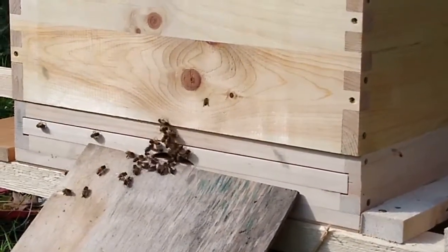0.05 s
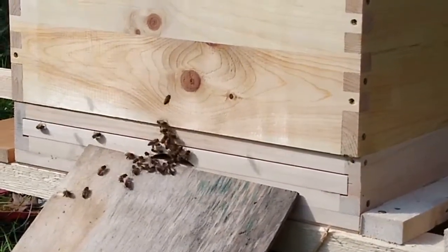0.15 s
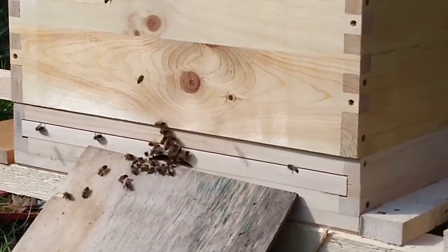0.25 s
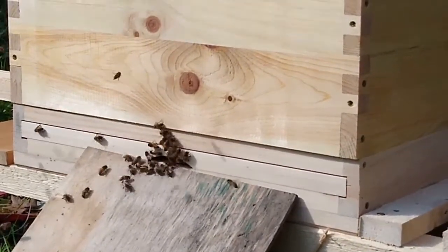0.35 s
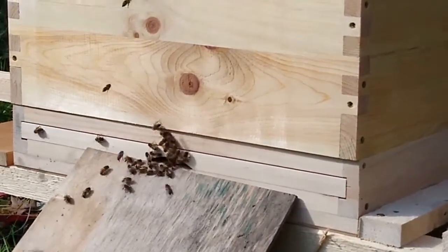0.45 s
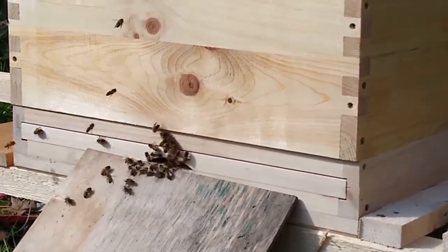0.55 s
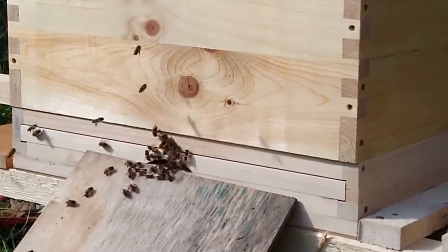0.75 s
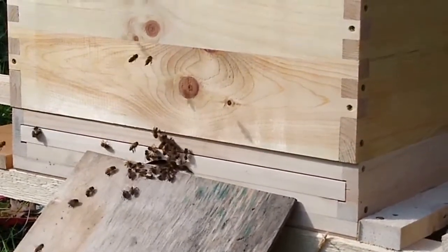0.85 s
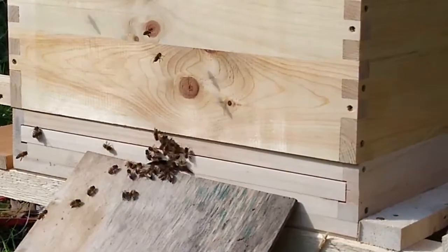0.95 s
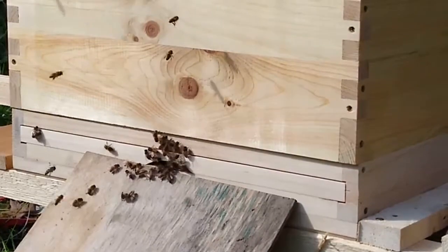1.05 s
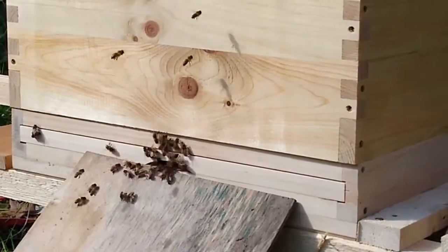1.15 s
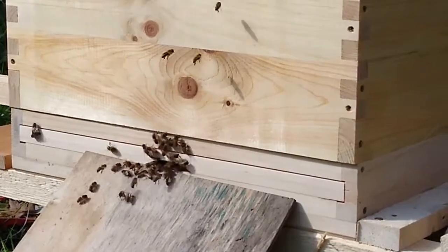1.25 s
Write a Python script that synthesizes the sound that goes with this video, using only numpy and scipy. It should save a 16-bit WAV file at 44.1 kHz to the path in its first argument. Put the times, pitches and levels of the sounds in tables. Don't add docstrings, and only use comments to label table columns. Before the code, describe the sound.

Two hollow, wavering bird hoots with slight yard echo, the second stronger; two quick high falling chirps come between them, while bees pass with quiet low hums, far birds whistle and thin airy hiss lies beneath, in stereo.

```python
import sys
import numpy as np
from scipy import signal
from scipy.fft import rfft, irfft, next_fast_len
from scipy.io import wavfile
from scipy.ndimage import uniform_filter1d, map_coordinates

SR = 44100
rng = np.random.default_rng(int(sys.argv[2]) if len(sys.argv) > 2 else 0)


def master(y):
    cut = np.clip(np.atleast_2d(y).T, -1, 1)
    pcm = np.round(cut * 32767)
    wavfile.write(sys.argv[1], SR, pcm.astype(np.int16))


def volts_from_decibels(level):
    exponent = np.asarray(level, float) / 20
    return 10 ** exponent


N = 57330


def unit(x):
    return x / np.sqrt(np.mean(x ** 2) + 1e-20)


def along(points, hz):
    f, v = np.transpose(points)
    return np.interp(np.log(hz + 1), np.log(f + 1), v)


def level(rows):
    return volts_from_decibels(np.interp(np.arange(N) / SR, *np.transpose(rows)))


def wobble(rate):
    return map_coordinates(rng.standard_normal(300), [np.arange(N) * min(rate, 200) / SR])


def rasp(share, rate):
    return (1 + share * (wobble(rate) + 1j * wobble(rate))) / np.sqrt(1 + 2 * share ** 2)


def filtered(x, response):
    m = next_fast_len(N + 8192)
    return irfft(rfft(x, m) * response(np.fft.rfftfreq(m, 1 / SR)), m)[..., :N]


def tone(hz, db, tones, brighten=(0, 0), blur=0):
    turn = 2 * np.pi * np.cumsum(hz) / SR
    slack_db = brighten[0] * (db - db.max()) + brighten[1] * (hz - hz.max())
    rows = []
    for multiple, tone_db in tones:
        k = round(multiple)
        line = rasp(blur * (multiple > 1.5), 150) * np.exp(1j * k * turn)
        rows.append(volts_from_decibels(tone_db + (k - 1.5) * slack_db) * np.real(line))
    return np.sqrt(2) * volts_from_decibels(db) * np.array(rows)


def call(rows, tones, brighten):
    s, hz, db = np.transpose(rows)
    t = np.arange(N) / SR
    hz = uniform_filter1d(np.interp(t, s, hz), size=350)
    db = np.interp(t, [s[0] - .004, *s, s[-1] + 0.0046], [-130, *db, -130])
    db = uniform_filter1d(db, size=200)
    return tone(hz, db, tones, brighten, blur=2), hz, db


def rush(spectrum, patchy_db):
    # frequency in Hz, left-right likeness from 0 to 1.
    alike = [(30, 0.44), (150, 0.93), (400, 0.38), (1000, 1), (3000, 0.15)]
    z = signal.stft(rng.standard_normal((2, N)), nperseg=1024)[2]
    field = uniform_filter1d(rng.standard_normal(z.shape[1:]), size=4, axis=0)
    field = uniform_filter1d(field, size=5, axis=1)
    pair = signal.istft(z * volts_from_decibels(patchy_db * unit(field)), nperseg=1024)[1][:, :N]
    shape = [(2, -120), *spectrum[1:-1], (SR / 2, spectrum[-1][1])]

    def response(hz):
        angle = np.arccos(np.clip(along(alike, hz), -1, 1)) / 2
        return volts_from_decibels(along(shape, hz)) * [np.cos(angle), np.sin(angle)]

    mid, side = filtered(pair, response)
    return unit(np.array([mid + side, mid - side]))


def yard(x, wet_db, gap_s):
    # frequency in Hz, time to decay by 60 dB in seconds.
    decay = [(500, 0.44), (2000, 0.44), (8000, 0.23), (15000, .14)]
    hz, t, z = signal.stft(rng.standard_normal((2, SR)), SR, nperseg=256)
    tail = signal.istft(z * volts_from_decibels(-60 * t / along(decay, hz)[:, None]), SR, nperseg=256)[1]
    late = np.pad(x, (round(gap_s * SR), 0))[None]
    wet = signal.fftconvolve(late, tail, axes=1)[:, :N]
    return volts_from_decibels(wet_db) * filtered(wet, lambda f: 1 / np.sqrt(along(decay, f) * SR / (6 * np.log(10))))


def air():
    # frequency in Hz, spectral level in dB per Hz.
    rumble, leaves, hiss = [(13, -54), (22, -26.5), (43, -6), (173, -0.5), (292, -13.5), (329, -14.5),
                            (487, -17), (583, -30), (800, -31), (1040, -34), (1760, -120)], [(5000, -120), (7500, -14.5), (9000, 9.5), (11400, 6),
                                            (13000, -7.5), (15500, -13), (16000, -17)], [(600, 1), (1000, -1), (2000, -4.5),
                                                            (4000, -4.5), (8000, -4), (11400, -1),
                                                            (13500, -3.5), (15500, -5)]
    # time in seconds, level in dB.
    rumble_level, breeze, hiss_level = [(0, -64), (.3, -59.5), (.55, -66), (.7, -62.5), (.95, -59.5),
                                        (1.15, -66.5), (1.3, -66)], [(0, -95), (.15, -92), (.24, -85), (.33, -92),
                                                              (.68, -92), (.76, -85), (.98, -85),
                                                              (1.1, -89), (1.3, -93)], [(0, -80.5), (.25, -79.5),
                                                                              (.55, -80.5), (.7, -80.5),
                                                                              (.9, -79.5), (1.1, -80),
                                                                              (1.3, -81)]
    low = rush([*rumble[:-3], (800, -42), (1400, -60), (1600, -120)], patchy_db=1.5)
    low = level(rumble_level) * volts_from_decibels(.7 * wobble(9)) * low
    rustle = level(breeze) * rush(leaves, patchy_db=3)
    thin = rush([(200, -120), (300, -40), *hiss, (16000, -10)], patchy_db=2.4)
    return low + rustle + level(hiss_level) * thin


def far_birds():
    # start in seconds, length in seconds, first pitch in Hz, last pitch in Hz; those from 15 kHz up
    notes_far = [(-.05, .11, 4600, 4520), (.068, .04, 4570, 4620), (.115, .11, 4700, 4640),
                 (.1, .1, 5450, 5480), (.195, .035, 6500, 6050), (.218, .03, 5900, 4900),
                 (.245, .045, 7750, 7700), (.375, .115, 5500, 5400), (.49, .07, 5500, 5250),
                 (.62, .04, 4600, 4600), (.712, .17, 4750, 4550), (.955, .06, 5450, 5050),
                 (1.12, .2, 4410, 4380), (1.18, .07, 1900, 1920), (.25, .09, 560, 650),
                 (.505, .08, 1310, 1300), (.21, .06, 3300, 3300), (1.02, .2, 3300, 3450),
                 (.36, .05, 628, 560), (.228, .035, 6750, 6750), (.368, .03, 15600, 15000),
                 (.535, .028, 15500, 15100), (.215, .04, 6200, 5500), (.285, .035, 10700, 10650),
                 (.38, .05, 11500, 11400), (.525, .035, 11200, 11000), (.825, .025, 9800, 9800),
                 (.775, .03, 11100, 11000), (.92, .03, 11300, 11000), (.205, .04, 12600, 12200)]
    notes_db = [-75, -69, -79.5, -78.5, -77.5, -71.5, -81, -72.5, -78.5, -84.5, -77, -66.5, -77, -88, -70,
                -87.5, -90.5, -82, -96.5, -87, -63, -64.5, -73.5, -76, -86.5, -79, -78.5, -70.5, -75, -79.5]
    edge_s, lag_s = .01, .0005
    t, out, scattered = np.arange(N) / SR, np.zeros((2, N)), np.zeros(N)
    for (s, length, hz0, hz1), db in zip(notes_far, notes_db):
        hz = np.interp(t, [s, s + length], [hz0, hz1]) * (1 + .006 * wobble(30))
        shape = np.clip(np.minimum(t - s, s + length - t) / edge_s, 0, 1)
        blur = rasp(1.6 * min(hz0 / 3000, 1) ** 2, hz0 / 30)
        whistle = np.real(blur * np.exp(2j * np.pi * np.cumsum(hz) / SR))
        x = np.sqrt(2) * shape * volts_from_decibels(db + 2.5 * wobble(40)) * whistle
        thin = hz0 > 9000
        lag = round((2 * rng.random() - 1) * lag_s * SR)
        out += np.array([x * volts_from_decibels(-5 * thin), np.roll(x, lag)])
        scattered += x * volts_from_decibels(-8 * thin)
    return out + yard(scattered, wet_db=1, gap_s=0.0025)


def bees():
    # nearest moment in seconds, half length in seconds, wing beat in Hz; the 82 Hz row is a puff of
    passes = [(.05, .05, 243), (.13, .09, 161), (.38, .05, 205), (.42, .1, 128), (.64, .05, 250),
              (.81, .06, 154), (.85, .06, 240), (.99, .07, 238), (.97, .12, 127), (1.08, .08, 238),
              (.51, .045, 82), (.2, .05, 190), (.5, .05, 112)]
    passes_db = [-69.5, -62.5, -70.5, -64.5, -73.5, -60.5, -62.5, -59, -61.5, -72, -60.5, -65, -60]
    # multiple of the wing beat, level in dB.
    wing_tones = [(1, -1), (2, -8.5), (3, -34), (4, -31.5)]
    pan_db, lag_s = 1.5, .0002
    t, out = np.arange(N) / SR, np.zeros((2, N))
    for (s, half, hz), db in zip(passes, passes_db):
        near_db = np.maximum(-9 * ((t - s) / half) ** 2, -90) + 2.5 * wobble(25)
        x = tone(hz * (1 + .006 * wobble(18)), db + near_db, wing_tones).sum(axis=0)
        side = 2 * rng.random() - 1
        right = np.roll(x, round(lag_s * SR * side)) * volts_from_decibels(-pan_db * side)
        out += np.array([x * volts_from_decibels(pan_db * side), right])
    return out


def fowl():
    # time in seconds, pitch in Hz, level in dB.
    first = [
        (.135, 706, -110),
        (.165, 810, -71.5),
        (.19, 910, -65.5),
        (.225, 969.5, -51.5),
        (.255, 966, -48.5),
        (.275, 851, -62.5),
        (.3, 938, -76),
    ]
    second = [(.712, 838, -70.5), (.75, 828, -40.5), (.775, 939.4, -36), (.805, 963.4, -37),
              (.855, 837.2, -49), (.895, 970.5, -46.5), (.94, 1002, -44), (.966, 937, -55.5),
              (.982, 934, -42), (1.005, 858, -51), (1.035, 813, -58.5)]
    # multiple of the pitch, level in dB.
    first_tones, second_tones = [(1, 6), (2, -18), (3, -37.5), (7, -31), (8, -33)], [(1, 1), (2, -25.5), (3, -23.5), (4, -37), (5, -34),
                                                       (6, -40.5), (7, -39), (8, -32)]
    # frequency in Hz, spectral level in dB per Hz.
    breath_shape = [(900, -120), (1150, 0), (1350, 3), (1550, -14), (2300, -10), (3300, -20), (4500, -15),
                    (9000, -40)]
    # delay in seconds, left level in dB, right level in dB.
    echoes = [
        (.05, -34, -19),
        (0.106, -31, -20.5),
        (.2, -31, -34.5),
    ]
    lag_s = 0.00024
    out = np.zeros((2, N))
    for rows, tones in ((first, first_tones), (second, second_tones)):
        stack, hz, db = call(rows, tones, brighten=(.05, .022))
        x = stack.sum(axis=0)
        breath = filtered(rng.standard_normal(N), lambda f: volts_from_decibels(along(breath_shape, f)))
        breath = unit(breath) * volts_from_decibels(db - 34)
        pan_db = -3.5 - 0.034 * (hz - 900)
        pair = x * volts_from_decibels([pan_db / 2, -pan_db / 2])
        out += filtered(pair, lambda f: np.exp(1j * np.pi * f * lag_s * np.array([[1], [-1]])))
        for s, left_db, right_db in echoes:
            out += np.pad(x, (round(s * SR), 0))[:N] * volts_from_decibels([[left_db], [right_db]])
        out += yard(stack[0], wet_db=-8.5, gap_s=.015)
        out += yard(x - stack[0], wet_db=3, gap_s=.006)
        out += yard(breath, wet_db=3.5, gap_s=0.098)
    return out


def chirps():
    # time in seconds, pitch in Hz, level in dB.
    first, second = [(.322, 7800, -54), (.33, 8060, -53), (.343, 7904, -41.5), (.354, 7990, -34),
                     (.365, 7850, -40), (.378, 7694, -38), (.39, 7320, -50), (.399, 7140, -54),
                     (.404, 6720, -80)], [(.486, 7260, -56), (0.492, 7860, -45.5), (.503, 7970, -36),
                                      (0.515, 8180, -36.5), (.528, 7860, -37.5), (0.542, 7640, -44),
                                      (.556, 7630, -38.5), (0.564, 7360, -50), (0.572, 7030, -68)]
    # multiple of the pitch, level in dB.
    chirp_tones = [(1, -9)]
    lag_s, blur = -.00074, .45
    out = np.zeros((2, N))
    for rows in (first, second):
        stack = call(rows, chirp_tones, brighten=(0, .018))[0]
        x = stack.sum(axis=0) * volts_from_decibels(1.5 * wobble(130.0))
        pair = x * np.real([rasp(blur, 90.64), rasp(blur, 90)])
        out += filtered(pair, lambda f: np.exp(-1j * np.pi * f * lag_s * np.array([[1], [-1]])))
        out += yard(x, wet_db=-6.5, gap_s=0.00079)
    return out


def scene():
    return air() + far_birds() + bees() + fowl() + chirps()


def low_pass(x):
    return signal.sosfilt(signal.butter(12, 15630, fs=SR, output="sos"), x)


def record(dry):
    mix = filtered(dry, lambda hz: hz < 15800)
    return low_pass(mix)


dry = scene()
out = record(dry)
master(out)
```